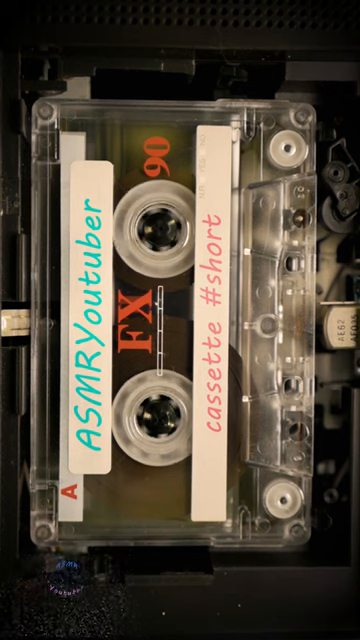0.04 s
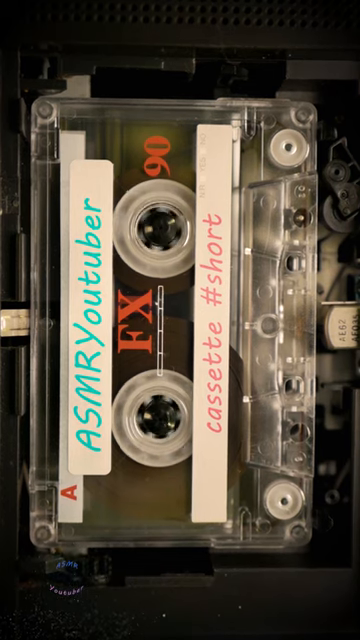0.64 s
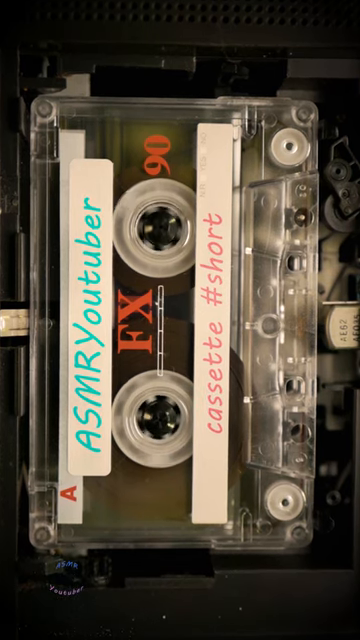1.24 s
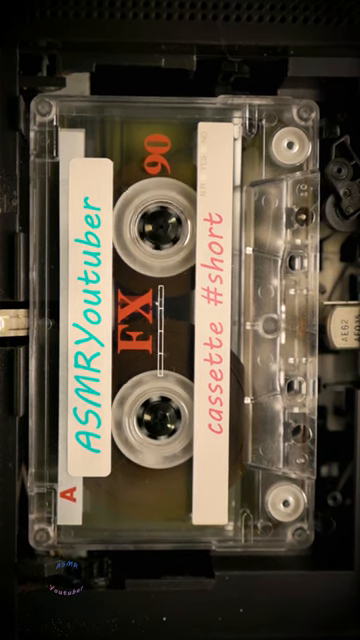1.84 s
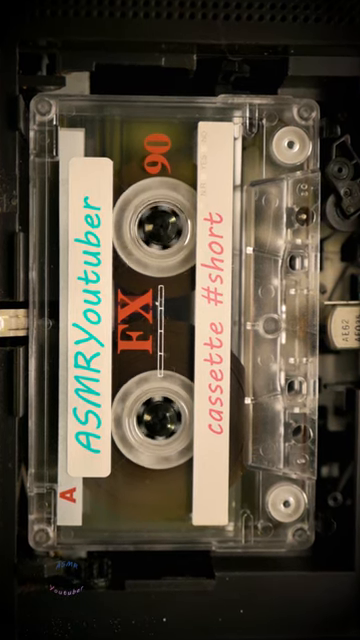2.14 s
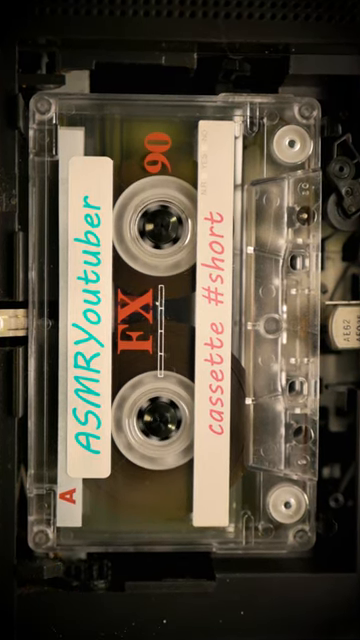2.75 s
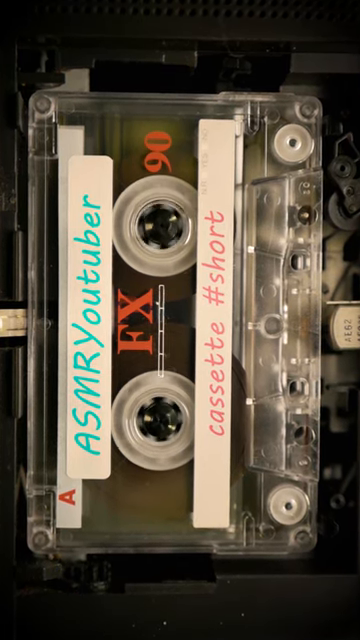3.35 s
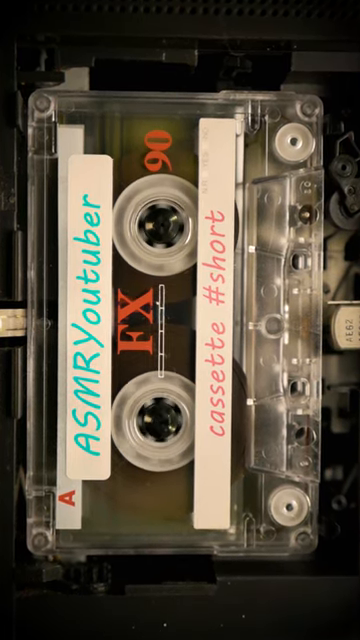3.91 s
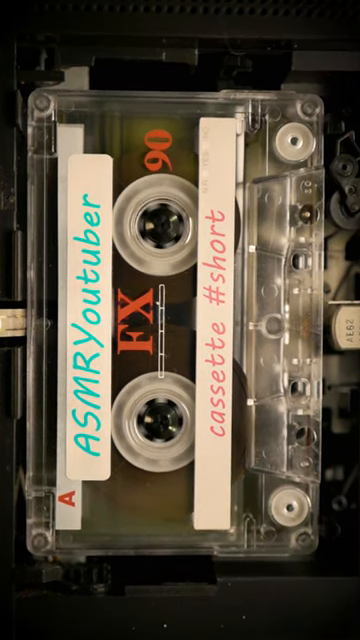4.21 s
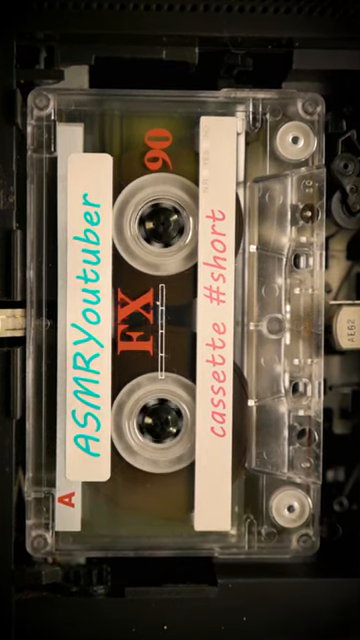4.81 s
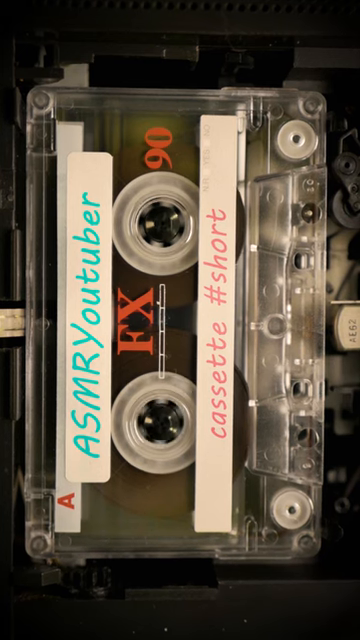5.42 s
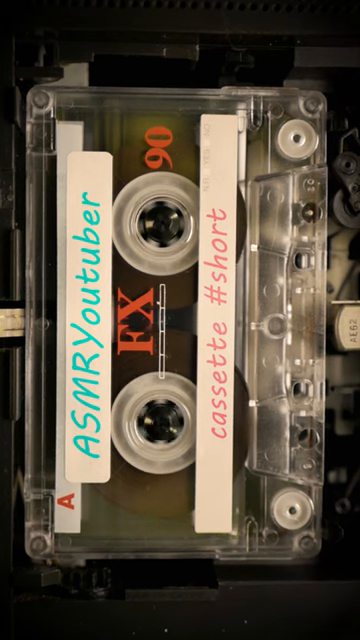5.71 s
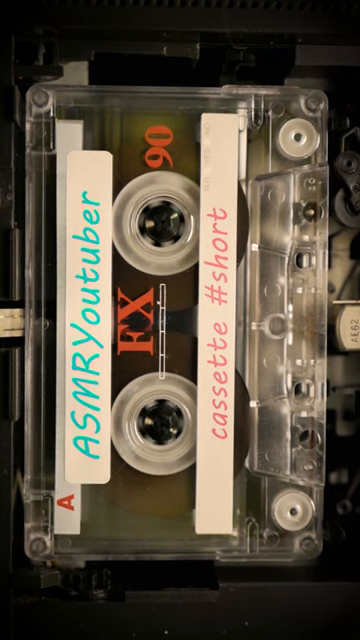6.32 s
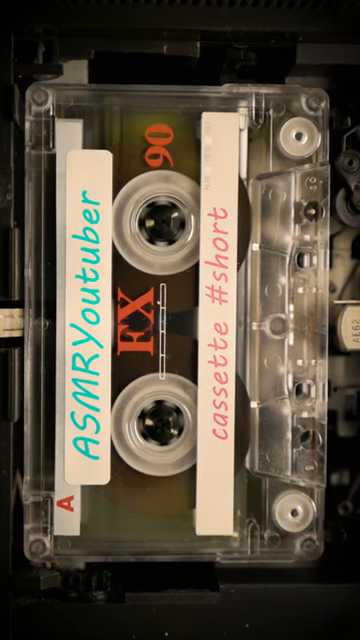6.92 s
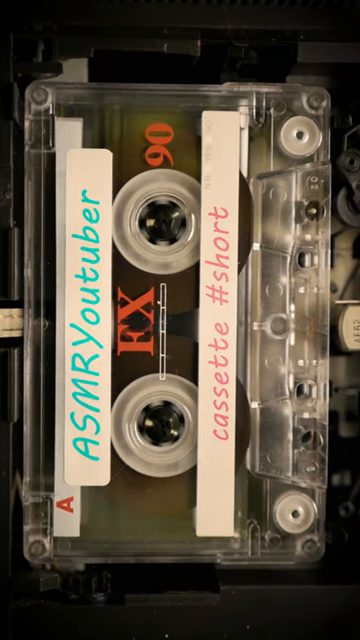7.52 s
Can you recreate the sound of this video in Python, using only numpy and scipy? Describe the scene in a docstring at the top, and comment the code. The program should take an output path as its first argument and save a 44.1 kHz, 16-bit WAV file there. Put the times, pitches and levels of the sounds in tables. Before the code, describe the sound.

Heard up close, a cassette spins through a fast wind: a high, slightly buzzy motor whine with a clean tone above it, bright whirring and tape hiss. It opens with a brief soft rustle, then gradually rises in pitch, levels off and sinks a little. The tape rubs faintly now and then, a few very high chirps flick past, and two barely audible bumps come late on.

```python
"""A thin, high whine over hiss: a cassette deck fast-winds close by, slowly speeding up, then easing off.
Each turn of the shaft modulates the drive's whine into clusters of lines, rough contact adds a whirr,
and a second wheel sings a pure tone. The tape hisses through its shell and now and then rubs.
There is a soft rustle at first, a few very high chirps, and two faint bumps later."""
import sys
import numpy as np
from scipy import signal
from scipy.fft import rfft, irfft, next_fast_len
from scipy.io import wavfile
from scipy.ndimage import uniform_filter1d, map_coordinates

SR = 44100
rng = np.random.default_rng(int(sys.argv[2]) if len(sys.argv) > 2 else 0)


def unload_wav(signal):
    """Save mono or channel-first audio to the path in sys.argv[1] as 16-bit WAV at rate SR, clipped to [-1, 1]."""
    wavfile.write(
        sys.argv[1],
        SR,
        np.round(np.clip(np.atleast_2d(signal).T, -1, 1) * 32767).astype(np.int16),
    )


N = 333396
TOP_WHINE_HZ, TOP_SHAFT_HZ = 3072.6, 60.05  # at top speed


def amp(db):
    """Decibels to gain."""
    return 10 ** (np.asarray(db) / 20)


def unit(x):
    """x at rms 1."""
    return x / np.sqrt(np.mean(x ** 2) + 1e-20)


def clock():
    """The time of each sample in seconds."""
    return np.arange(N) / SR


def angle(hz):
    """Running phase of a changing frequency."""
    return 2 * np.pi * np.cumsum(hz) / SR


def sides(value):
    """Half of a value added on the left, half taken off on the right."""
    return np.array([[.5], [-.5]]) * value


def bell(value, centre, width):
    """A smooth hump of height 1; width is its standard deviation."""
    return np.exp(-((value - centre) / width) ** 2 / 2)


def along(points, hz):
    """A curve through (Hz, value) points on a log frequency axis."""
    point_hz, values = np.transpose(points)
    return np.interp(np.log(hz + 1), np.log(point_hz + 1), values)


def humps(bands, hz):
    """Gain of a set of (Hz, width, dB) resonances."""
    return np.sqrt(sum(amp(db) ** 2 / (1 + 2 * ((hz - centre) / width) ** 2) ** 2
                       for centre, width, db in bands))


def wobble(rate):
    """A smooth random curve, rate knots a second."""
    position = np.arange(N) * rate / SR
    coarse = position[::16]
    knots = rng.standard_normal(int(position[-1]) + 4)
    return np.interp(position, coarse, map_coordinates(knots, [coarse]))


def slowness(speed):
    """0 at top speed, 1 at the slowest."""
    return (speed.max() - speed) / np.ptp(speed)


def noise(gain, likeness):
    """Stereo noise; gain and left-right likeness are functions of frequency."""
    # How the noise leans in the stereo image. Each row: frequency in Hz, left over right in dB.
    balance = [(300, 0), (900, -1), (3500, -0.9), (5300, .4), (7000, -1.5), (8000, 2.5), (15000, 1)]
    size = next_fast_len(N, True)
    hz = np.fft.rfftfreq(size, 1 / SR)
    spread = np.arccos(np.clip(likeness(hz), -1, 1)) / 2
    mid, side = rfft(rng.standard_normal((2, size))) * gain(hz) * np.sqrt(SR / 2)
    stereo = mid * np.cos(spread) + sides(1.69) * side * np.sin(spread)
    return irfft(stereo * amp(sides(along(balance, hz))), size)[:, :N]


def swells(rows, likeness):
    """Bands of noise that come and go with no sharp edge."""
    out = np.zeros((2, N))
    for peak_s, db, width_s, pitch_hz, width_hz in rows:
        band = unit(noise(lambda hz: bell(hz, pitch_hz, width_hz), lambda hz: likeness))
        out += amp(db) * bell(clock(), peak_s, width_s) * band
    return out


def patchy(x, depth_db):
    """Small patches of time and frequency grow louder and softer at random."""
    spectra = signal.stft(x, nperseg=512)[2]
    patches = uniform_filter1d(rng.standard_normal(spectra.shape[1:]), size=5, axis=0)
    patches = uniform_filter1d(patches, size=12, axis=1)
    return signal.istft(spectra * amp(depth_db * unit(patches)), nperseg=512)[1][:, :N]


def tape_hiss(speed, gain_db=0.13, slow_db=1.5, flutter_db=0.68, scrape_db=0.52, reel_hz=35.2):
    """The running tape hisses and flutters against its guides, and throbs slightly as the reel turns."""
    # The colour of tape and shell. Each row: frequency in Hz, noise density in dB.
    colour = [(25, -104), (150, -103.7), (350, -103), (520, -101), (750, -96), (1000, -91.5), (1500, -84.5),
              (2300, -84), (3200, -82.5), (4400, -82.5), (5400, -84.5), (7000, -85), (10000, -89.5),
              (15500, -89.5)]
    # The stereo width of the hiss. Each row: frequency in Hz, left-right likeness from -1 to 1.
    image = [(50, 0.12), (300, -0.0032), (700, -0.38), (1300, -0.79), (2200, -0.51), (2800, -0.24),
             (4000, -0.055), (8000, -0.043), (12000, 0.59)]
    hiss = noise(lambda hz: amp(along(colour, hz)), lambda hz: along(image, hz))
    flow_db = gain_db + slow_db * slowness(speed)
    throb_db = 0.2 * np.sin(angle(reel_hz * speed) + wobble(4.2))
    return hiss * amp(flow_db + throb_db + flutter_db * wobble(40) + scrape_db * wobble(300))


def rustle(steady_db=-20.5, fall_per_rise=3.4, uneven_db=2.0, likeness=0.13, low_cut_hz=400):
    """A soft rustle in swells that rise quickly and fall slowly, fading over the first two seconds."""
    # The hollow colour of the rustle. Each row: centre in Hz, width in Hz, noise density in dB.
    rustle_bands = [(467, 83, -89.5), (667, 88, -83.5), (852, 146, -83), (1024, 50, -82.5),
                    (1295, 140, -84), (1780, 500, -85.5)]
    # The swells of the rustle. Each row: peak time in seconds, gain in dB, rise in seconds.
    surges = [(.02, 2, 0.028), (.22, 3.5, 0.071), (1.08, -5.5, 0.18), (1.95, -11, .18)]
    t = clock()
    power = amp(steady_db) ** 2
    for peak_s, db, rise_s in surges:
        attack = bell(np.minimum(t, peak_s), peak_s, rise_s)
        decay = np.exp(-np.maximum(t - peak_s, 0) / (fall_per_rise * rise_s))
        power = power + (amp(db) * attack * decay) ** 2
    colour = lambda hz: humps(rustle_bands, hz) * (1 - 1 / (1 + (hz / low_cut_hz) ** 10))
    return noise(colour, lambda hz: likeness) * np.sqrt(power) * amp(uneven_db * wobble(45))


def bumps():
    """Two faint, dull bumps, the second made of two overlapping puffs of noise."""
    # Each row: peak time in seconds, level in dB, width in seconds, pitch in Hz, width in Hz.
    puffs = [(6.015, -56, 0.0089, 1450, 220), (7.23, -61, .011, 855, 200), (7.238, -53.5, 0.017, 1730, 400)]
    return swells(puffs, likeness=.3)


def high_chirps(width_s=.0045, waver_hz=70):
    """Four faint, very high, wavering chirps."""
    # Each row: peak time in seconds, level in dB, pitch in Hz.
    chirps = [(1.393, -49, 14300), (1.452, -52, 15250), (1.461, -55, 14400), (6.574, -53, 15020)]
    out = np.zeros(N)
    for peak_s, db, hz in chirps:
        tone = unit(np.sin(angle(hz + waver_hz * wobble(250))))
        out += amp(db) * bell(clock(), peak_s, width_s) * tone
    return out


def rubs(scratch_db=2):
    """Now and then the tape rubs its guides harder, with a scratchy grain."""
    # Each row: peak time in seconds, level in dB, width in seconds, pitch in Hz, width in Hz.
    scrapes = [(1.8, -57, 0.11, 10600, 450), (3.45, -53.5, 0.47, 9500, 700), (3.55, -62.5, 0.52, 1950, 180),
               (4.15, -52.5, 0.13, 9800, 650), (7.3, -55, 0.93, 13000, 2000)]
    return swells(scrapes, likeness=0.55) * amp(scratch_db * wobble(70))


def whirr(speed, gain_db=-0.12, likeness=0.61, throb_db=.4, turn_db=1):
    """Rough contact in the drive, hardest once a turn; its noise bands rise with the speed."""
    # The bands at top speed. Each row: centre in Hz, width in Hz, noise density in dB.
    contact_bands = [(2914, 83, -78.5), (3537, 27, -78), (3810, 210, -88), (4460, 400, -91.5),
                     (5860, 25, -74), (6036, 220, -78.5), (6287, 186, -75), (6240, 13, -73),
                     (6790, 250, -83.5), (7540, 130, -84.5), (7900, 90, -88.5), (8220, 120, -81.5),
                     (8950, 440, -82.5), (10040, 210, -86.5), (11520, 900, -87.5), (12600, 200, -83.5),
                     (12940, 240, -83.5), (13480, 190, -91), (14520, 130, -94), (15300, 380, -99)]
    rough = noise(lambda hz: humps(contact_bands, hz), lambda hz: likeness)
    travel = np.cumsum(speed)
    varispeed = np.array([map_coordinates(side, [travel], order=5, mode="mirror") for side in rough])
    once_a_turn = np.cos(angle(speed * TOP_SHAFT_HZ))
    pressure = unit(amp(turn_db * once_a_turn + throb_db * wobble(80)))
    return amp(gain_db) * varispeed * pressure


def wheel(speed, ratio=1.2810, creep_per_s=.00122, level_db=-52.5, octave_db=-19, waver_db=1.0):
    """A second wheel, geared to the drive, sings one clean tone above the whine, with a weak octave."""
    hz = speed * TOP_WHINE_HZ * (ratio + creep_per_s * clock())
    phase = angle(hz + 1.2 * wobble(20)) + sides(0.86)  # the left side leads
    tone = np.sin(phase) + amp(octave_db) * np.sin(2 * phase)
    return np.sqrt(2) * amp(level_db + waver_db * wobble(25)) * tone


def drive_whine(speed, gain_db=-0.17, waver_db=1.2, scatter_rad=0.061):
    """Each turn of the shaft modulates the whine, so that its harmonics carry side lines."""
    # The lines of the whine. Each row: harmonic, offset in multiples of the shaft rate, level in dB,
    # extra dB at the slowest speed, left over right in dB, left lead in radians.
    lines = [ (1, -3, -55.5, -10, -1, .87), (1, -2, -52.7, -1, -.5, .41), (1, 0, -58, 2.5, 0, 1),
             (2, -21, -65.5, 5, 5, .18), (2, -14, -69.5, 5, 1, .54), (2, -7, -68, -1, 1, -.7),
             (2, -1, -64, 5, 1, .2), (2, 0, -50, -2, -.5, .03), (2, 1, -53, -4.5, 2, .19),
             (2, 7, -62.5, 1, 4, .4), (2, 13, -68, -2, 5, .2), (2, 21, -63.5, -1, -8, .84),
             (3, -16, -62, 1, 0, .2), (3, -15, -64.5, -4, -1, .3), (3, -7, -62, 10, 6, 1.3),
             (3, -6, -60.5, 1, 4, 1), (3, -4, -71, 10, 1, .4), (3, -2, -68, -1, -1, .6),
             (3, 0, -56.5, -5, 6, 2.14), (3, 1, -68, -5, 5, .4), (3, 11, -72, -1, 4, .2),
             (3, 12, -71.5, 3, 4, .3), (3, 14, -71.5, 0, 4, .3), (4, 0, -71, -2, -1, 0)]
    # Near top speed the whine meets a resonance. Its lift in dB: first, second, higher harmonics.
    resonance_db = [6.5, -0.9, 3.5]
    whine, shaft = angle(speed * TOP_WHINE_HZ), angle(speed * TOP_SHAFT_HZ)
    slow = slowness(speed)
    off_resonance = 1 - np.exp((speed - 1) / 0.024)  # 2.4 % of top speed wide
    out = np.zeros((2, N))
    for harmonic, offset, db, slow_db, pan_db, lead in lines:
        # The nearest pair of side lines is phased to bend the pitch; the outer ones start at random.
        start = rng.uniform(0, 2 * np.pi) * (abs(offset) > 1) + np.pi * (offset == -1)
        phase = harmonic * whine + offset * shaft + start + scatter_rad * wobble(45)
        lift_db = resonance_db[min(harmonic, len(resonance_db)) - 1]
        level_db = gain_db + db + slow_db * slow - off_resonance * lift_db + waver_db * wobble(30)
        out += np.sqrt(2) * amp(level_db + sides(pan_db)) * np.sin(phase + sides(lead))
    return out


def scene(fastest_s=5.5, sag_per_s2=.004484, flutter_hz=.4):
    """One arching, slightly fluttering speed plays whine, wheel and whirr over the hiss of the tape."""
    arch = 1 - sag_per_s2 * (clock() - fastest_s) ** 2
    speed = arch + flutter_hz * wobble(16) / TOP_WHINE_HZ  # 1 is top speed
    running = patchy(whirr(speed) + tape_hiss(speed), depth_db=1.15)
    return drive_whine(speed) + wheel(speed) + running + rubs() + high_chirps() + rustle() + bumps()


def record(dry, top_hz=15730):
    """A brick-wall low-pass takes off the highest treble."""
    size = next_fast_len(N + SR // 2, True)
    passband = np.fft.rfftfreq(size, 1 / SR) < top_hz
    return irfft(rfft(dry, size) * passband, size)[:, :N]


dry = scene()
out = record(dry)
unload_wav(out)
```